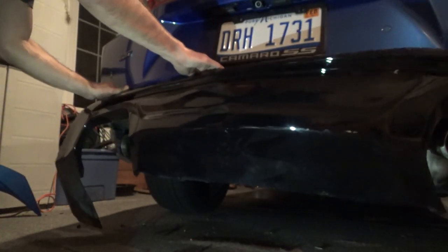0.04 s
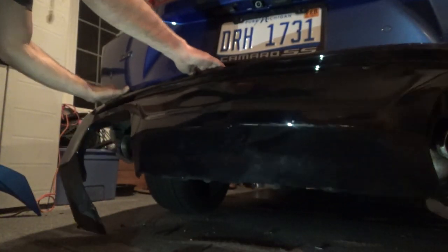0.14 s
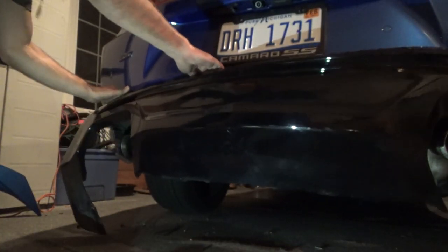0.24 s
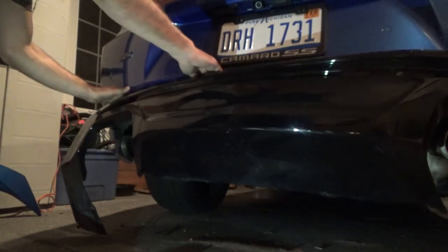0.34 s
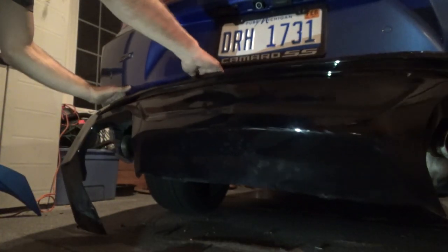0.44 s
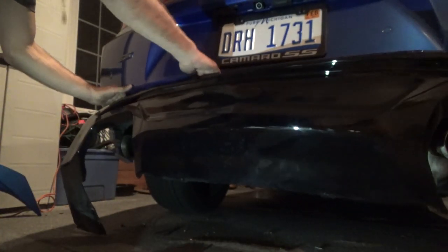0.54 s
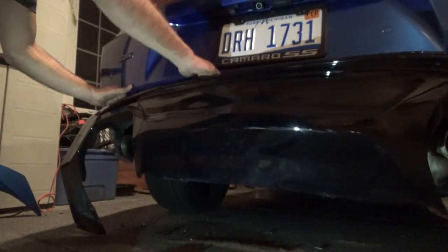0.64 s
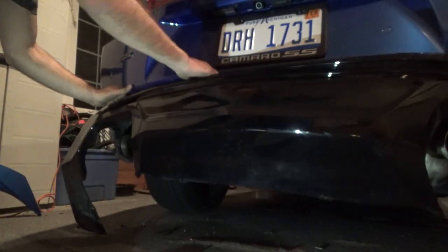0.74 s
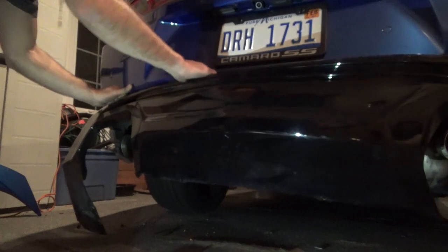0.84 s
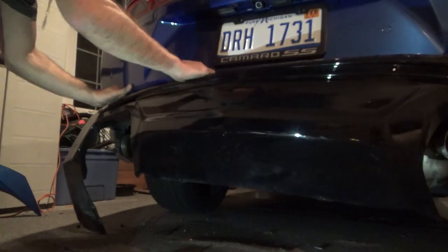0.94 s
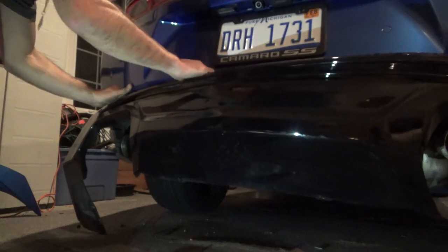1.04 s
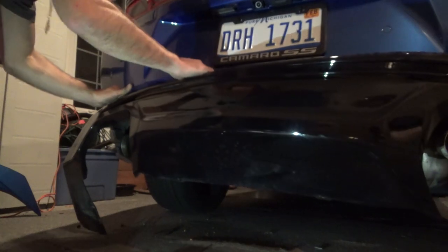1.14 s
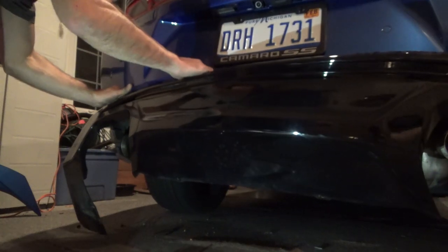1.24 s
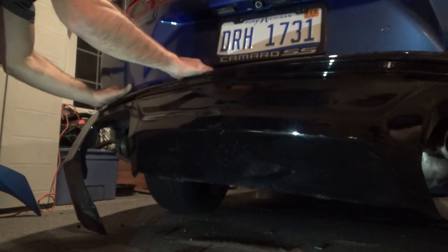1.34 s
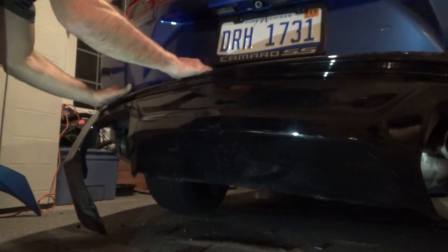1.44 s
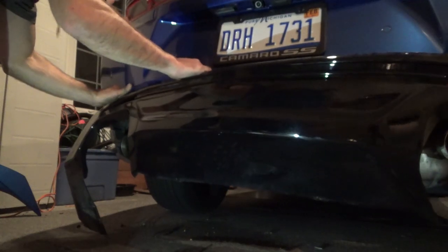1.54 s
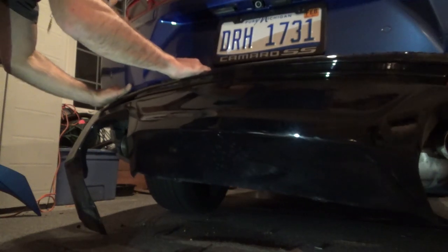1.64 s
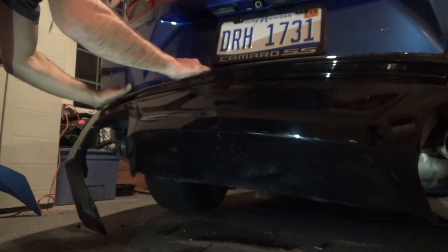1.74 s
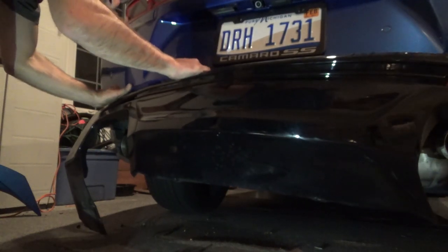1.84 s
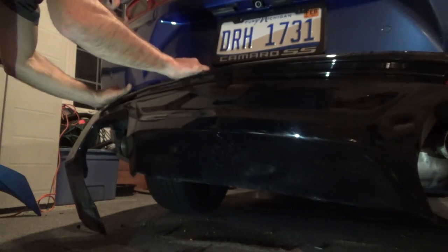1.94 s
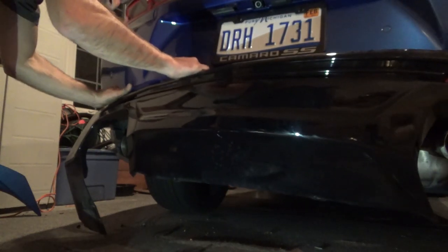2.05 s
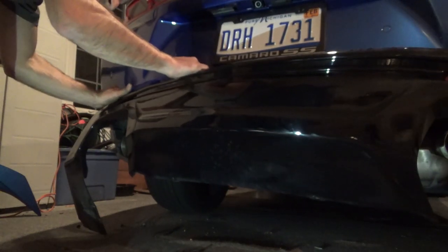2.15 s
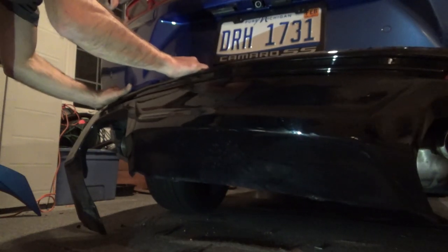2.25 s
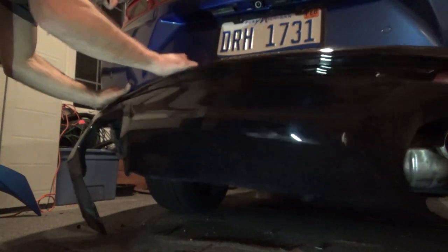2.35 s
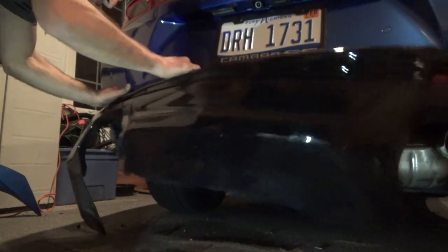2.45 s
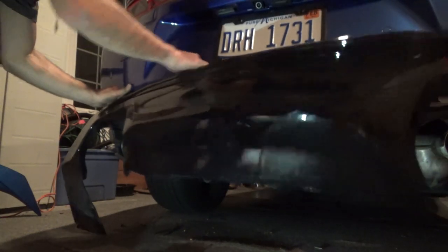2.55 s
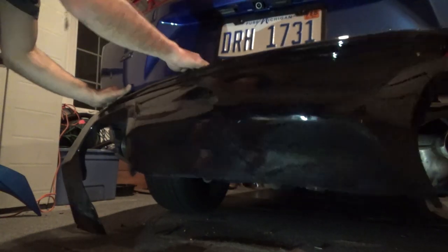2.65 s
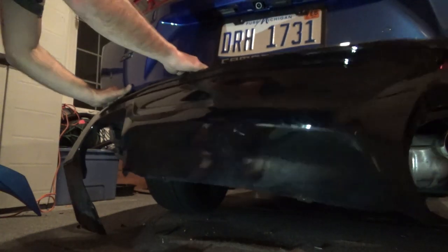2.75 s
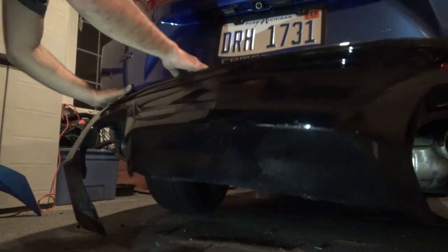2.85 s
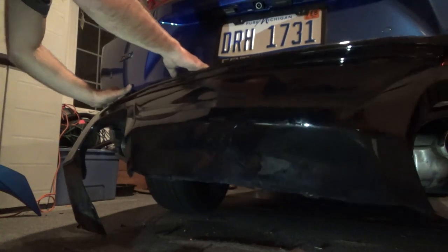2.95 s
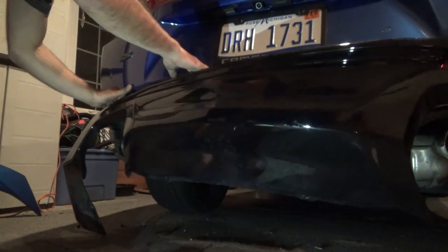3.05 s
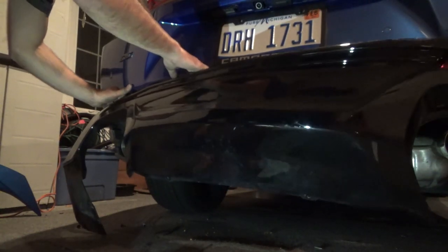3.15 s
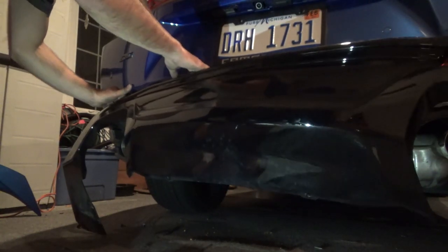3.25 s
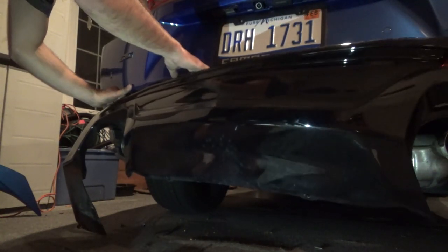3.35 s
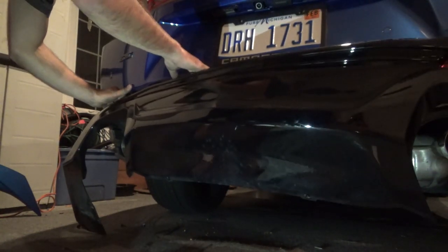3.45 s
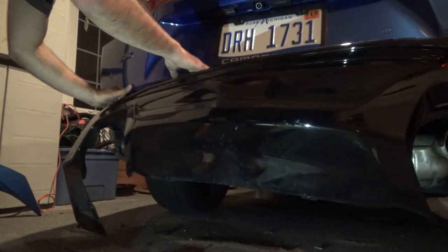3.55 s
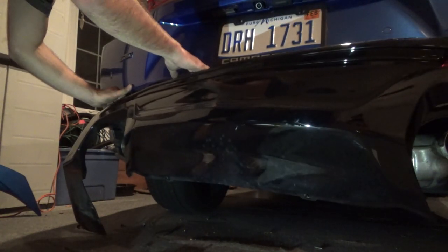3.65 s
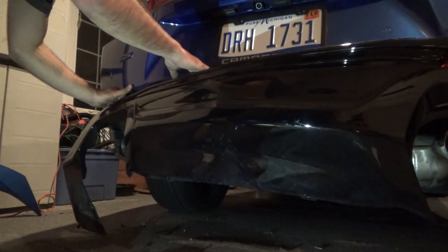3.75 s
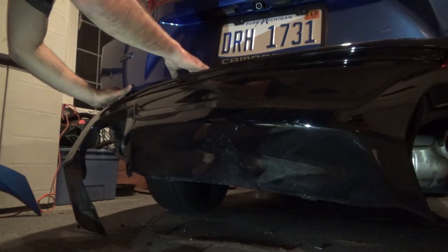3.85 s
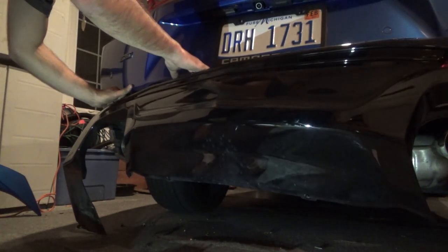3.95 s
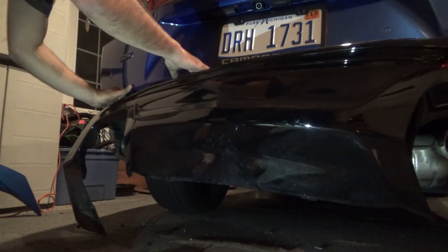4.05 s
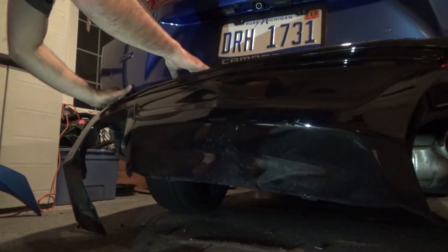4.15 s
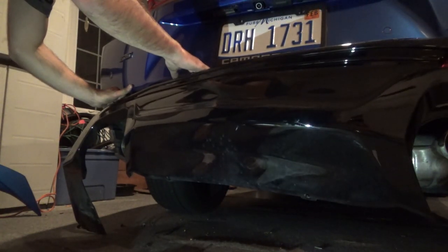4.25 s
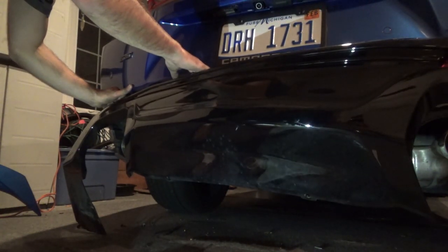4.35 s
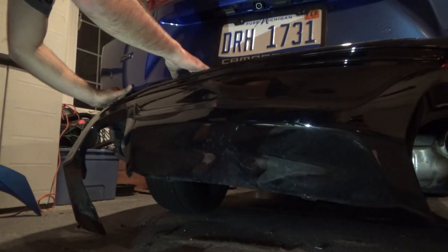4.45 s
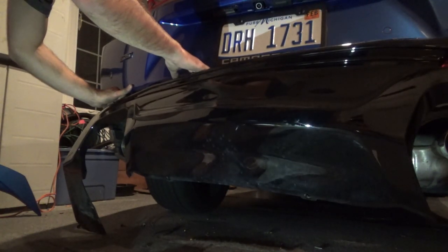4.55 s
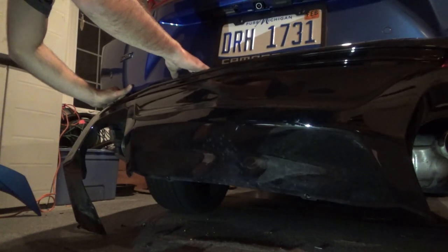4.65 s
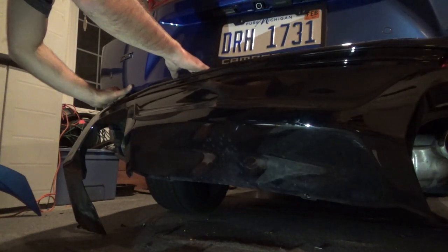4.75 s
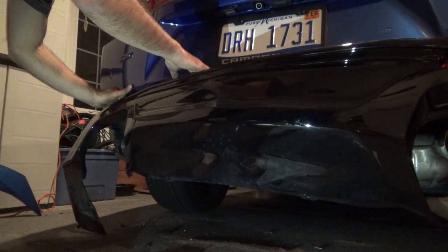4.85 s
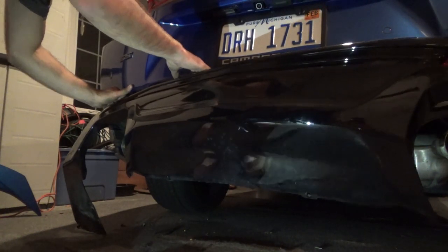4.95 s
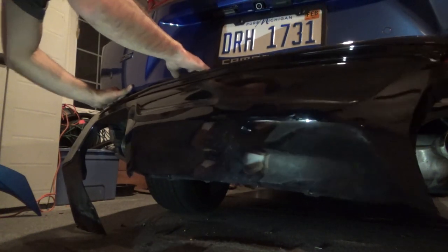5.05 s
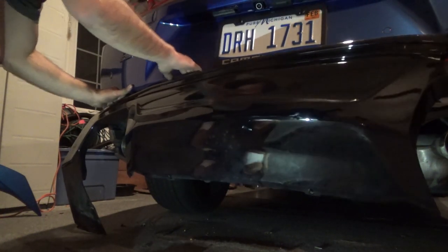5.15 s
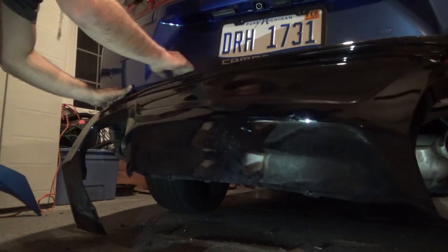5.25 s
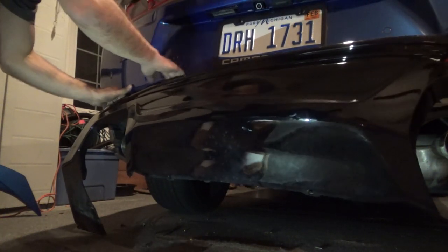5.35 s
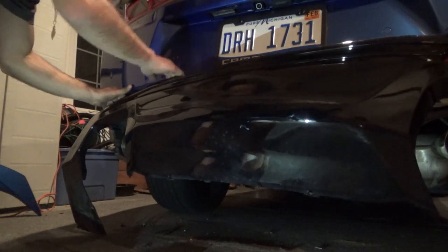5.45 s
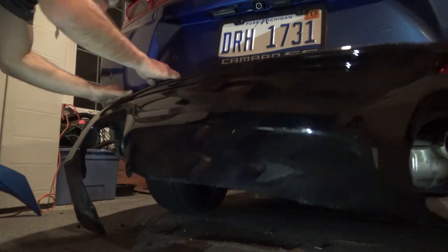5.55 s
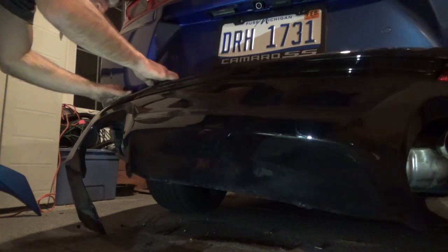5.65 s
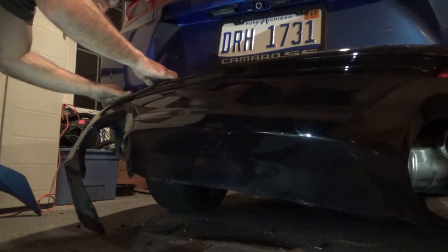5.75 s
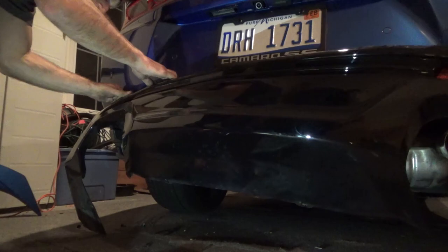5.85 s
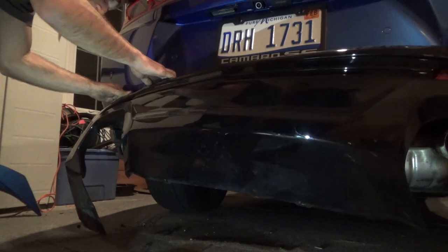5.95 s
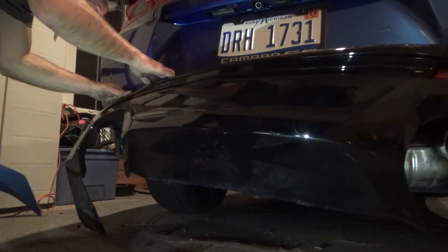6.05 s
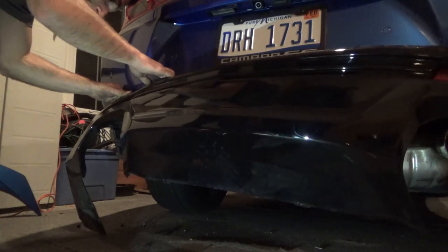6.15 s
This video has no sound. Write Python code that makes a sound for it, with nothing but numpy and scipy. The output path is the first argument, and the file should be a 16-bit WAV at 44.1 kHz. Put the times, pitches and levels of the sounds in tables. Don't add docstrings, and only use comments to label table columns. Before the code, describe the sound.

Close stereo microphones hear hands working a hollow plastic panel: small clicks, dull knuckle thuds, dry rubbing. A strong thud precedes a rapid ripping burst of cracks, far louder than everything else, followed by fading slaps. Then mostly a fast, steady cricket trill, faint motor hum and hiss remain, until a last cluster of ticks, thuds and drags. Short hard reflections suggest a concrete garage.

```python
import sys
import numpy as np
from scipy import signal
from scipy.fft import rfft, irfft
from scipy.io import wavfile

SR = 44100
rng = np.random.default_rng(int(sys.argv[2]) if len(sys.argv) > 2 else 0)


def dump_mix(stems):
    frames = np.atleast_2d(stems).T
    limited = np.clip(frames, -1, 1)
    pcm = np.round(limited * 32767).astype(np.int16)
    wavfile.write(sys.argv[1], SR, pcm)


def linear_from_db(decibels):
    return 10 ** (np.asarray(decibels, float) / 20)


N = 273420

# f/Hz, level/dB, t60/s
PANEL_MODES = [(69.8, -36, 0.067), (143.8, -11.5, 0.035), (170, -23, 0.026), (226, -1, 0.11),
               (302.9, -16.5, 0.0303), (380, -9.5, 0.014), (427, -10.5, 0.034)]
SHELL_HZ = np.geomspace(330, 6000, 34)
LOOSE_HZ = 252.3
LOOSE_T60_S, HELD_T60_S = 0.05, 0.085


def rms_one(x):
    return x / np.sqrt(np.mean(x ** 2) + 1e-30)


def peak_one(x):
    return x / np.max(np.abs(x))


def at_hz(points, hz):
    table_hz, value = np.transpose(points)
    return np.interp(np.log(hz), np.log(table_hz), value)


def high_pass(x, order, hz):
    return signal.sosfilt(signal.butter(order, hz, "high", fs=SR, output="sos"), x)


def resonance(x, hz, width_hz):
    r = np.exp(-np.pi * width_hz / SR)
    poles = [1, -2 * r * np.cos(2 * np.pi * hz / SR), r * r]
    return signal.lfilter([(1 - r * r) / 2, 0, (r * r - 1) / 2], poles, x)


def noise_line(hz, width_hz):
    noise = rng.standard_normal(N)
    return rms_one(resonance(resonance(noise, hz, width_hz), hz, width_hz))


def stereo_bands(length, gain, likeness):
    out, edges = 0, 22 * 2 ** np.arange(0, 9.6, 0.5)
    white = rng.standard_normal((2, 2, length))
    for k, (low, high) in enumerate(zip(edges, edges[1:])):
        band = signal.butter(2, [low, high], "band", fs=SR, output="sos")
        mid, side = signal.sosfilt(band, white[k % 2])
        hz = np.sqrt(low * high)
        alike = np.clip(at_hz(likeness, hz), 0, 1)
        out = out + gain(hz) * (np.sqrt(1 + alike) * mid + np.sqrt(1 - alike) * side * [[1], [-1]])
    return out


def ring(x, hz, t60):
    r, w = linear_from_db(-60 / (t60 * SR)), 2 * np.pi * hz / SR
    return signal.lfilter([0, np.sin(w)], [1, -2 * r * np.cos(w), r * r], x + 1e-18)


def body(x, modes, spread_db=0):
    gains = linear_from_db(np.array(modes)[:, 1] + spread_db) * (-1) ** np.arange(len(modes))
    return sum(g * ring(x, hz, t60) for g, (hz, _, t60) in zip(gains, modes))


def shell(force, centre_hz, fall_db, spread_db):
    octaves = np.log2(SHELL_HZ / centre_hz)
    distance = np.where(octaves > 0, 1.3 * octaves, -octaves)
    slope_db = -fall_db * distance - 6 * (SHELL_HZ / 5500) ** 3
    t60 = 19.1 / SHELL_HZ
    return body(force, np.transpose([SHELL_HZ, slope_db, t60]), spread_db)


def edge(x):
    # f/Hz, width/Hz, level/dB
    edge_modes = [(5600, 8700, 10.5), (8140, 3000, 0.5), (11800, 3566, 8), (13730, 2000, 3.5)]
    bright = 0
    for k, (hz, width_hz, db) in enumerate(edge_modes):
        bright = bright + (-1) ** k * linear_from_db(db) * resonance(x, hz, width_hz)
    return high_pass(bright, 2, 3600)


def grit(shape, per_s, size_db):
    sizes = linear_from_db(size_db * np.minimum(rng.exponential(1, shape), 4)) * rng.choice([-1, 1], shape)
    return sizes * (rng.random(shape) < per_s / SR) + 0.082 * rng.standard_normal(shape)


def contacts(s, thump_db, knock_db, edge_db, knock_hz, thump_hz, length_s,
             fade_s, first_jolt, thump_t60, fall_db, size_db):
    events = np.transpose(np.broadcast_arrays(s, thump_db, knock_db, edge_db, knock_hz, thump_hz, length_s))
    size = 7000
    t, out = np.arange(size) / SR, np.zeros((2, N + size))
    slips = grit((len(events), size), per_s=7000, size_db=size_db)
    spots = rng.normal(0, 1, (len(events), len(PANEL_MODES) + len(SHELL_HZ)))
    soft = np.hanning(290)
    for event, slip, spot in zip(events, slips, spots):
        start_s, thump_db, knock_db, edge_db, centre_hz, hz, length = event
        force = slip * (1 + np.exp(-t / 0.0058)) * np.exp(-np.maximum(t - abs(length), 0) / fade_s)
        force[0] += first_jolt
        push = np.convolve(force, soft * np.sin(2 * np.pi * hz * t[:len(soft)]))[:size]

        thump = ring(push, hz, thump_t60) + 0.16 * ring(push, LOOSE_HZ, thump_t60)
        thump += 0.49 * body(push, PANEL_MODES, 1.8 * spot[:len(PANEL_MODES)])
        knock = shell(force, centre_hz, fall_db, 2.1 * spot[len(PANEL_MODES):])

        at = round((start_s + 0.0018) * SR)
        early = at - 165
        out[0, early:early + size] += linear_from_db(thump_db) * peak_one(thump)
        out[1, at:at + size] += linear_from_db(knock_db + 7) * peak_one(knock)
        out[1, at:at + size] += linear_from_db(edge_db + 12.5) * peak_one(edge(force))
    return out[:, :N]


def background():
    # f/Hz, level per Hz/dB
    hiss_curve = [(20, -13.5), (80, -4), (250, -3.5), (700, -7), (1100, -5.5), (2000, -10.5), (4500, -14.5),
                  (16000, -23)]
    # f/Hz, likeness/0-1
    hiss_likeness = [(60, 0.97), (130, 0.98), (290, 0.77), (640, 0.12), (1410, 0.082), (3100, 0.17),
                     (6820, 0.49), (15000, 1)]
    # f/Hz, width/Hz, level/dB
    hum_lines = [(149.2, 14, -72), (950, 6.7, -82.5), (1122, 21, -77.5), (1380, 5.4, -85.5),
                 (1510, 8.1, -84.5), (7090, 570, -78)]
    air = stereo_bands(N, lambda hz: linear_from_db(at_hz(hiss_curve, hz)), hiss_likeness)
    lines = sum(linear_from_db(db) * noise_line(hz, width_hz) for hz, width_hz, db in hum_lines)
    return linear_from_db(-61) * rms_one(air) + lines


def cricket():
    weak_strokes = np.array([.014, .198, .763, 1.427, 1.64, 1.88, 2.014, 2.28, 3.349, 3.457, 3.538, 3.643,
                             3.776, 3.912, 4.043, 4.87, 5.138, 5.271, 5.458])
    stroke_s, first_stroke_s = 0.026683, 0.0405
    wing_hz, start_hz = 3338, 3873
    t, out = np.arange(520) / SR, np.zeros(N + 520)
    start = np.sin(np.pi * np.clip(t / 0.0044, 0, 1)) * np.sin(2 * np.pi * start_hz * t)
    swell = (1 - np.exp(-t / 0.00045)) * np.clip((0.0095 - t) / 0.0022, 0, 1)
    note = swell * np.sin(2 * np.pi * wing_hz * t)
    strokes = np.arange(first_stroke_s - stroke_s, N / SR, stroke_s)
    for s, (loud, late, high) in zip(strokes, rng.normal(0, 1, (len(strokes), 3))):
        weak = np.min(np.abs(weak_strokes - s)) < stroke_s / 3
        at = round((s + 0.00003 * late) * SR)
        out[at:at + len(t)] += linear_from_db(-57 - 18 * weak + 0.6 * loud) * note
        out[at:at + len(t)] += linear_from_db(-61.5 + 1.5 * high) * np.roll(start, 150 * weak)
    return out[:N]


def clip_ticks():
    # t/s, plastic knock peak/dB, sharp edge peak/dB, knock centre f/Hz
    tick_events = [(0.045, -43.5, -37, 1900), (0.212, -57.5, -48.5, 990), (0.286, -60, -63, 1240),
                   (0.376, -48.5, -44.5, 516), (1.357, -54, -58, 1830), (1.747, -54, -50.5, 3800),
                   (2.042, -59, -73, 1380), (2.188, -53, -72, 1500), (2.705, -55.5, -53.5, 528),
                   (5.051, -51, -47.5, 1800), (5.069, -64, -57, 5000), (5.078, -48, -43, 1500),
                   (5.24, -42.5, -61, 5140), (5.444, -55, -72, 780), (5.457, -61, -49, 854),
                   (5.555, -38, -61, 2530), (5.602, -43.5, -61, 2300)]
    s, knock_db, edge_db, knock_hz = np.transpose(tick_events)
    return contacts(s, knock_db - 1.5, knock_db, edge_db, knock_hz, thump_hz=347, length_s=0,
                    fade_s=0.0025, first_jolt=19, thump_t60=0.0297, fall_db=11.0, size_db=6.0)


def thuds():
    # t/s, thump peak/dB, thump f/Hz, plastic knock peak/dB
    thud_events = [(0.049, -42.5, 214, -44.5), (0.173, -54, 140, -53), (0.301, -33, 226, -47.5),
                   (0.409, -43.5, 226, -55), (0.494, -42.5, 446, -55.5), (0.513, -39, 263, -43.5),
                   (0.931, -42, 226, -62), (1.069, -61, 216, -58.5), (1.283, -47, 226, -70),
                   (1.416, -50, 221.5, -68), (1.591, -21, 234, -56), (1.61, -34, 246, -72),
                   (1.905, -46, 249, -73), (1.995, -48, 250, -68), (2.114, -59, 240, -83),
                   (2.25, -57, 241, -84), (2.789, -54, 146, -64), (3.107, -52, 222, -75),
                   (3.242, -52, 223.2, -64), (5.083, -40.5, 370, -50.5), (5.243, -43.5, 327, -37),
                   (5.145, -41, 226, -72), (5.257, -36, 455, -47), (5.406, -35.5, 348, -52),
                   (5.468, -47, 237, -63), (5.515, -43, 226, -69), (5.576, -34, 226, -55),
                   (5.648, -52, 252, -54)]
    s, thump_db, thump_hz, knock_db = np.transpose(thud_events)
    return contacts(s, thump_db, knock_db, knock_db - 13.5, 644, thump_hz, length_s=0,
                    fade_s=0.0078, first_jolt=8.0, thump_t60=HELD_T60_S, fall_db=10.0, size_db=2.5)


def drag():
    # t/s, pull/dB
    pulls = [
        [(0.1, -59), (0.24, -52.5), (0.412, -45.5), (0.55, -48), (0.67, -54.5), (0.804, -52.5), (1.07, -57),
         (1.25, -72)],
        [(1.5, -69), (1.594, -47), (1.792, -75), (2.0, -65.5), (2.33, -57)],
        [(2.5, -44), (2.556, -42), (2.672, -46), (2.764, -52), (2.918, -73), (3.3, -78)],
        [(4.95, -56.5), (5.084, -59), (5.28, -55), (5.448, -51), (5.518, -52.5), (5.648, -59), (5.8, -62)],
    ]
    t, levels = np.arange(N) / SR, np.zeros((3, N))
    for pull in pulls:
        s, pull_db = np.transpose(pull)
        fade = np.clip(np.minimum(t - s[0], s[-1] - t) / 0.05, 0, 1)
        pull_db = np.interp(t, s, pull_db)
        hiss_db = -63 + 0.3 * (pull_db + 56)
        levels += fade * linear_from_db(np.array([pull_db - 1.5, pull_db, hiss_db]) - 7.5)
    flex, scrape, hiss = grit((3, N), per_s=5200, size_db=2.5)
    low = levels[0] * rms_one(body(flex, PANEL_MODES))
    bright = levels[1] * rms_one(shell(scrape, 3000, 1.7, 0)) + levels[2] * rms_one(edge(hiss))
    return np.array([low, bright])


def slips(s, thump_db, knock_db, edge_db, knock_hz, length_s):
    return contacts(s, thump_db, knock_db, edge_db, knock_hz, 226, length_s,
                    fade_s=0.0082, first_jolt=3.7, thump_t60=0.076, fall_db=4.5, size_db=4.0)


def scrapes():
    # t/s, plastic knock peak/dB, knock centre f/Hz, length/s
    scrape_events = [(0.2234, -57.5, 1020, 0.029), (0.517, -50.5, 1060, 0.017), (0.678, -53, 1800, 0.02),
                     (0.7195, -45, 2280, 0.038), (0.7874, -49, 1340, 0.017), (0.8267, -50.5, 3670, 0.021),
                     (1.5004, -59, 1170, 0.023), (1.6724, -51, 2960, 0.036), (1.939, -52.5, 1440, 0.037),
                     (2.032, -53, 1405, 0.032), (2.077, -56.5, 931, .013), (2.1442, -56, 1339, 0.035),
                     (2.198, -58, 1470, 0.019), (2.25, -55, 1350, 0.027), (5.2461, -49.5, 600, 0.03),
                     (5.376, -45, 1550, 0.026), (5.443, -43.5, 2380, 0.016), (5.5582, -42, 1680, 0.027),
                     (5.607, -45, 1900, 0.032)]
    s, knock_db, knock_hz, length_s = np.transpose(scrape_events)
    return slips(s, knock_db - 1.5, knock_db, knock_db - 17, knock_hz, length_s)


def edge_slides():
    # t/s, sharp edge peak/dB, knock centre f/Hz, length/s
    slide_events = [
        (0.3283, -43.5, 3140, 0.013),
        (0.455, -45, 1910, 0.033),
        (0.547, -52.5, 1050, .025),
        (0.652, -50, 2830, 0.039),
        (2.9146, -60.5, 920, 0.025),
        (5.133, -61, 1450, .027),
        (5.3258, -54, 985, 0.061),
        (5.378, -50, 1480, 0.02),
    ]
    s, edge_db, knock_hz, length_s = np.transpose(slide_events)
    return slips(s, edge_db + 1, edge_db - 1.5, edge_db, knock_hz, length_s)


def release():
    # t/s, thump peak/dB, plastic knock peak/dB, sharp edge peak/dB
    tear_events = [
        (2.338, -16, -14.5, -25.5),
        (2.343, -11.5, -16.5, -16.5),
        (2.351, -10, -14.5, -20),
        (2.364, -10.5, -15, -21.5),
        (2.375, -17, -18.5, -19),
        (2.387, -11, -21.5, -30.5),
        (2.395, -13.5, -16, -24),
        (2.411, -34, -24.5, -26.5),
        (2.435, -25, -25.5, -32),
    ]
    s, thump_db, knock_db, edge_db = np.transpose(tear_events)
    return contacts(s, thump_db, knock_db, edge_db, 617.5, LOOSE_HZ, length_s=0.0085,
                    fade_s=0.011, first_jolt=7.8, thump_t60=LOOSE_T60_S, fall_db=-1.6, size_db=4.0)


def slaps():
    # t/s, thump peak/dB, plastic knock peak/dB, knock centre f/Hz
    slap_events = [
        (2.461, -25, -20, 2240),
        (2.483, -28, -37, 900),
        (2.545, -34, -47, 900),
        (2.618, -34.5, -39.5, 895),
        (2.635, -43.5, -43.5, 455),
        (2.69, -48, -48.5, 698),
        (2.754, -56, -61, 554),
    ]
    s, thump_db, knock_db, knock_hz = np.transpose(slap_events)
    return contacts(s, thump_db, knock_db, knock_db - 17, knock_hz, LOOSE_HZ, length_s=0.0055,
                    fade_s=0.005, first_jolt=8.4, thump_t60=LOOSE_T60_S, fall_db=3.2, size_db=3.0)


def wobble(shake):
    shaken = signal.lfilter([0.0003], [1, -0.9997], np.abs(shake))
    return linear_from_db(-38 + 19.5) * shaken * noise_line(69.85, 29.6)


def ports(x):
    # f/Hz, phase/rad
    port_lead = [(60, 0.31), (260, 0.33), (1600, 0.91), (3000, 0.1)]
    lead = at_hz(port_lead, np.maximum(np.fft.rfftfreq(N, 1 / SR), 1)) / 2
    scatter = rng.standard_normal(600) * np.exp(-np.arange(600) / 31.0)
    scatter = signal.lfilter([1, -0.3, -0.7], [1, -0.97], scatter)
    scatter /= np.sqrt(np.sum(scatter ** 2))
    side = linear_from_db(-22) * signal.fftconvolve(x.mean(axis=0), scatter)[:N]
    return irfft(rfft(x) * np.exp(1j * lead * [[1], [-1]]), N) + side * [[1], [-1]]


def garage(x):
    # f/Hz, t60/s
    garage_t60 = [(60, 0.93), (250, 0.33), (1000, 0.36), (4000, 0.5), (12000, 0.28)]
    # f/Hz, likeness/0-1
    tail_likeness = [(60, 0.29), (250, 1), (1000, 0.54), (4000, 0.61), (12000, 0.78)]
    t = np.arange(30000) / SR
    tail = stereo_bands(len(t), lambda hz: linear_from_db(-60 * t / at_hz(garage_t60, hz)), tail_likeness)
    tail *= np.clip((t - 0.002) / 0.008, 0, 1)
    tail /= np.sqrt(np.sum(tail ** 2) / 2)
    return linear_from_db(-8.5) * signal.fftconvolve(x[None], tail, axes=1)[:, :N]


def scene():
    handling = clip_ticks() + thuds() + drag() + scrapes() + edge_slides()
    low, bright = handling + release() + slaps()
    low = high_pass(low, 6, 150)
    bright = high_pass(bright, 2, 180)
    near = ports(low * linear_from_db(np.array([[0.4], [-0.4]])) + bright) + wobble(bright)
    room = garage(0.3 * low + bright)
    insect = cricket() * linear_from_db(np.array([[-0.5], [0.5]]))
    return near + room + insect + background()


def top_cut(x):
    return signal.sosfilt(signal.butter(12, 16860, fs=SR, output="sos"), x)


def record(dry):
    rounded = 0.66 * np.tanh(dry / 0.84)
    top = signal.cheby2(18, 45, 16150, fs=SR, output="sos")
    mix = high_pass(signal.sosfilt(top, rounded), 2, 30)
    return top_cut(mix)


dry = scene()
out = record(dry)
dump_mix(out)
```